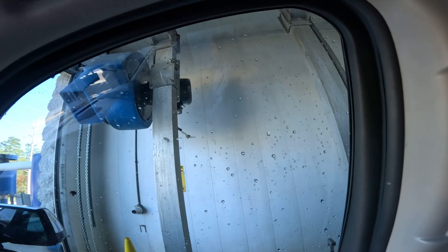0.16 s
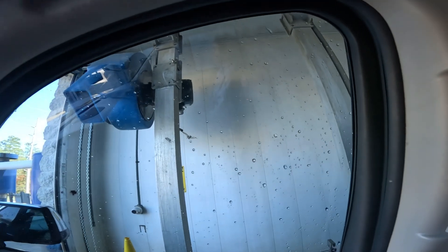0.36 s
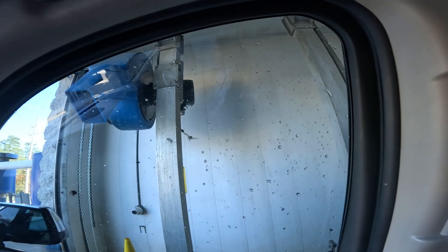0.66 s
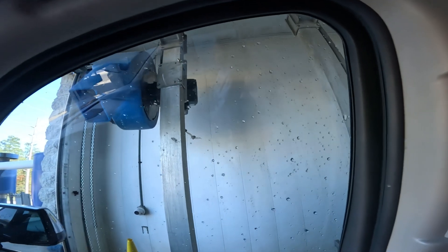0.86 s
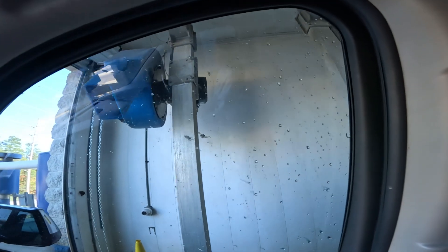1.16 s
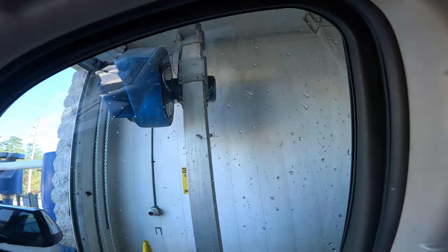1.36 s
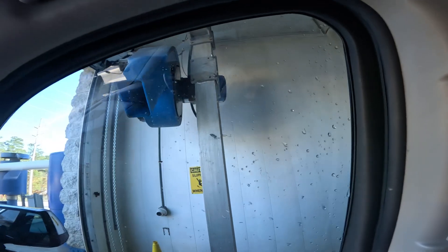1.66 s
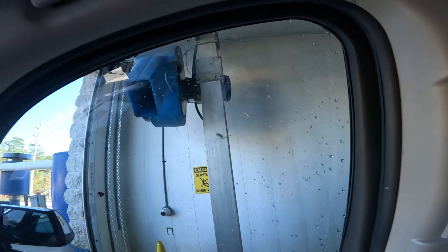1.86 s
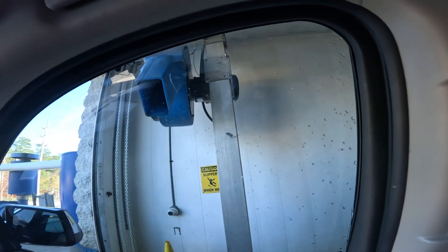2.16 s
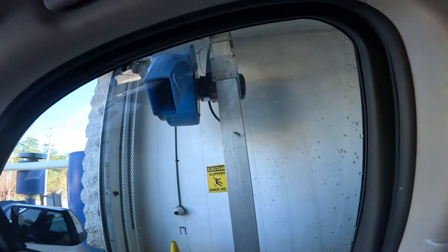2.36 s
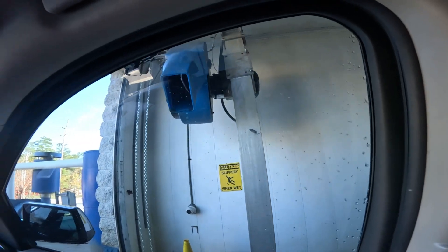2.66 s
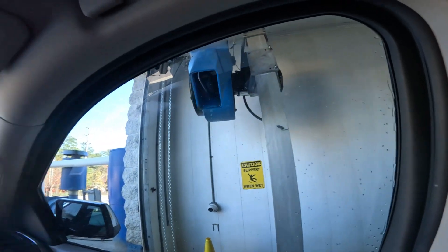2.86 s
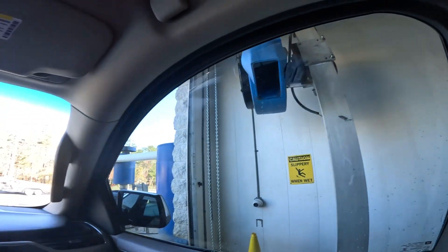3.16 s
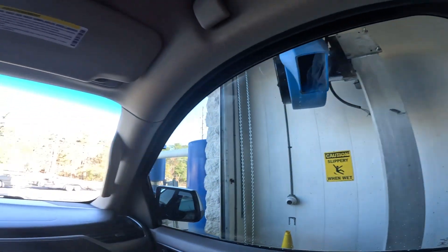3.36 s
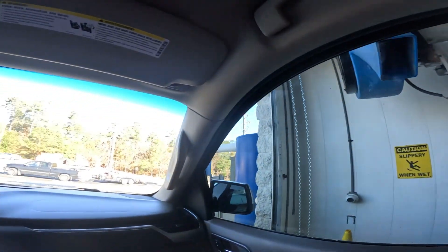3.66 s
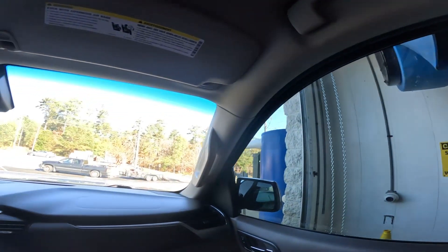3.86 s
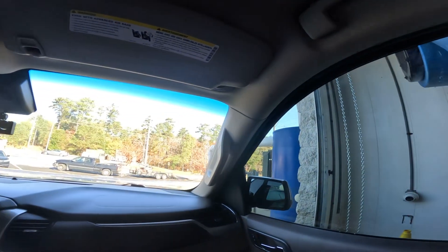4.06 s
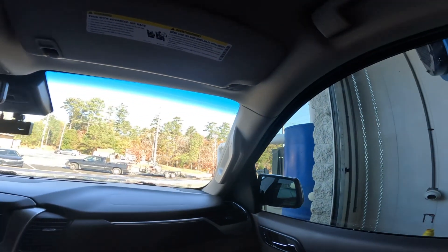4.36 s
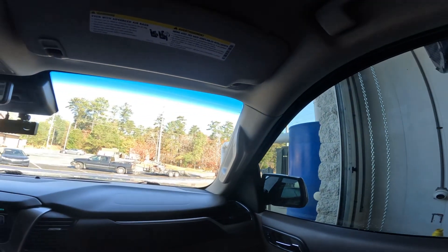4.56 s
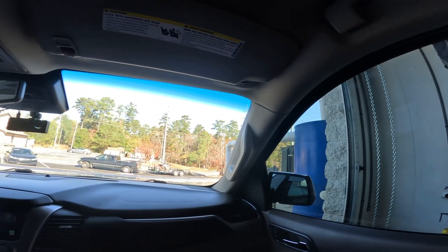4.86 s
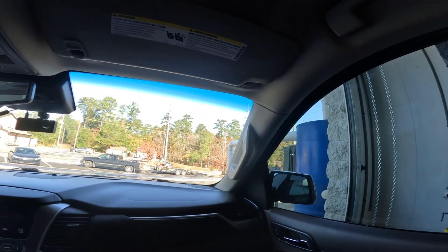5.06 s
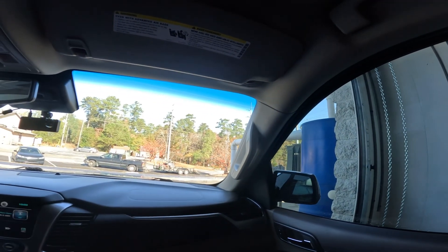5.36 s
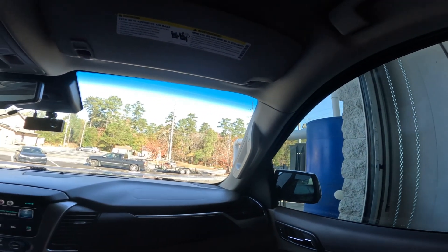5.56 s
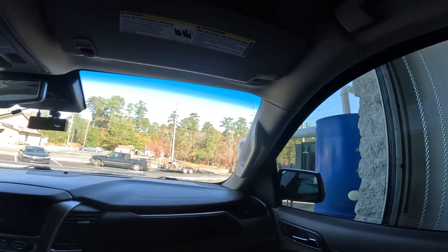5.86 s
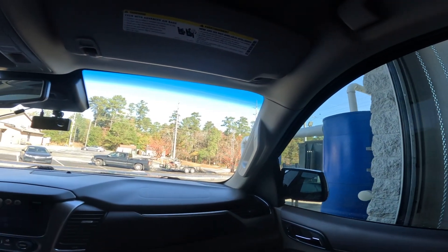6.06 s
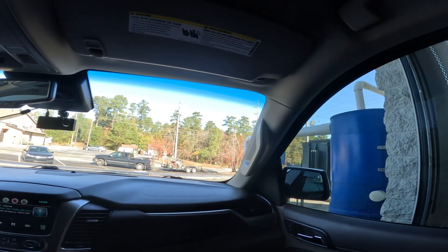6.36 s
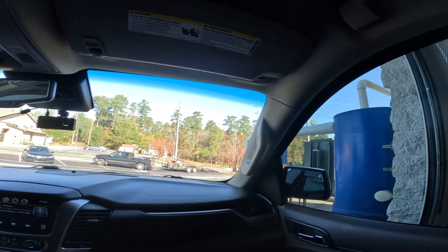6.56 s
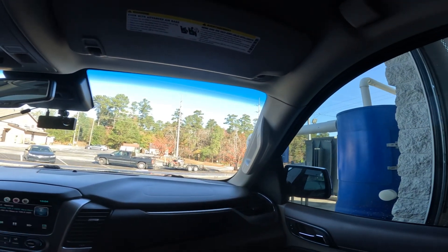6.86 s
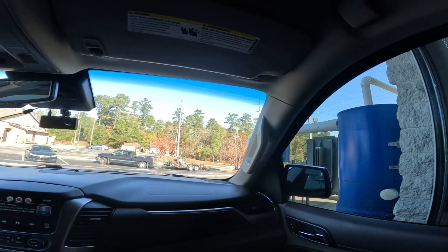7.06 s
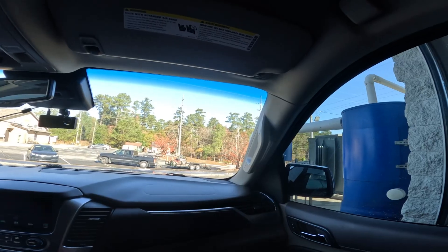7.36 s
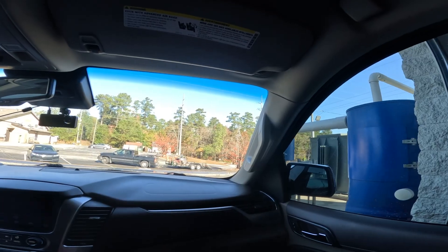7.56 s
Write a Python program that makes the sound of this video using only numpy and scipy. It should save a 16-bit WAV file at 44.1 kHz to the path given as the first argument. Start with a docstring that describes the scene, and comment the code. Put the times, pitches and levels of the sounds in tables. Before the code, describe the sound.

Inside a closed car, powerful car wash dryers make the cabin boom with deep, fluttering bass and a low unsteady drone under a muffled fan roar. A sharp drop ticks the window early. A faint whine grows, sags and vanishes about midway as the side jet roars on the glass; afterwards the rumble continues, deeper and less tonal. Close cabin microphone, wide stereo, slightly stronger on the left.

```python
"""Deep booms and a roar fill a closed car as it rolls slowly out beneath car wash drying blowers.
The air jets travel along the body: filtered noise sounds the resonances of cabin, panels and window in turn,
and unsteady sine tones make the body drone. Shaped noise carries the fan roar through the glass;
narrow noise bands give the blade tones, a wandering sine the faint whine, and short noise bursts the drops.
A limiter holds the bass down."""
import sys
import numpy as np
from scipy import signal
from scipy.fft import rfft, irfft, next_fast_len
from scipy.io import wavfile
from scipy.ndimage import uniform_filter1d, minimum_filter1d

SR = 44100
rng = np.random.default_rng(int(sys.argv[2]) if len(sys.argv) > 2 else 0)


def digitize_waveform(pressure):
    """Quantize a signal to 16-bit integers and store it at the path in sys.argv[1].

    Rows of a 2-D input are taken as channels; values are limited to [-1, 1].
    """
    field = np.atleast_2d(pressure).T
    bounded = np.clip(field, -1, 1)
    quanta = np.round(bounded * 32767).astype(np.int16)
    wavfile.write(sys.argv[1], SR, quanta)


N = 340893
T = np.arange(N) / SR
SIZE = next_fast_len(N, real=True)
HZ = np.fft.rfftfreq(SIZE, 1 / SR)

# All levels are those ahead of the bass limiter. A reach, rise or fall is the time to 1/e of a bell;
# the whine's rise and fall are the spans of soft steps.
# Booms of the cabin air, each loudest as the jet passes its antinode:
# centre_hz, width_hz, level_db (jet at the antinode), passing_s, reach_s, away_db (loss when the jet is far)
CABIN_MODES = [(31.82, 31, -21, 7.0, 3.2, 6.5), (62.82, 36, -19, 1.8, 2.9, 7),
               (101.9, 32, -21.5, 4.5, 3.6, 7.5), (129, 38, -20, 5.0, 1.0, 6.5),
               (206.1, 32, -26.5, 0.4, 2.1, 7), (333.3, 50, -30.5, 3.2, 1.5, 7),
               (380.6, 45, -36.5, 4.2, 1.5, 14.5), (515, 70, -45, 7.1, 1.1, 15.5)]
# Brief swells and dips of the deepest rumble: centre_s, change_db
RUMBLE_SURGES = [(2.55, 0.5), (4.05, -8.5), (4.4, 6)]
SURGE_REACH_S = 0.15
DEEP_BELOW_HZ = 90


def cabin():
    """Modal excitation: a jet drives each mode of the cabin air hardest at its antinode."""
    surge_db = np.zeros(N)
    for centre_s, change_db in RUMBLE_SURGES:
        surge_db += change_db * nearness(centre_s, SURGE_REACH_S, SURGE_REACH_S)
    out = np.zeros((2, N))
    for hz, width_hz, level_db, passing_s, reach_s, away_db in CABIN_MODES:
        away = 1 - nearness(passing_s, reach_s, reach_s)
        mode_db = level_db - away_db * away
        if hz < DEEP_BELOW_HZ:
            mode_db = mode_db + surge_db
        out += resonance(hz, width_hz) * gain_of(mode_db)
    return out


# Resonances of the roof and door panels: centre_hz, width_hz, level_db (at its loudest)
PANEL_MODES = [(144.8, 35, -25), (161.6, 19, -24), (236.8, 46, -28), (288.5, 62, -31), (424.5, 75, -37),
               (514.5, 90, -43), (653.4, 52, -51), (705, 58, -49.3), (751, 36, -55)]
# The jet drives the lowest panel resonance first and ever higher ones as the car rolls on.
SWEEP_START_S, SWEEP_S_PER_OCTAVE = 2.67, 1.24
PANEL_REACH_S, PANEL_AWAY_DB = 2.67, 6


def panels():
    """Forced plate vibration: the travelling jet drives the panel resonances in turn, from low to high."""
    lowest_hz = PANEL_MODES[0][0]
    out = np.zeros((2, N))
    for hz, width_hz, level_db in PANEL_MODES:
        passing_s = SWEEP_START_S + SWEEP_S_PER_OCTAVE * np.log2(hz / lowest_hz)
        away = 1 - nearness(passing_s, PANEL_REACH_S, PANEL_REACH_S)
        out += resonance(hz, width_hz) * gain_of(level_db - PANEL_AWAY_DB * away)
    return out


# Notes of the cabin air and the roof under the jet:
# pitch_hz (mean), wander_hz (rms), level_db (rms, before the flutter), start_s, end_s
DRONE_NOTES = [(62.3, 4, -24.5, 0.2, 3.75), (151.5, 3.2, -21.5, 1.5, 3.7)]
DRONE_FADE_S, DRONE_FLUTTER_DB = 0.13, 1.0


def drone():
    """Sustained oscillation: cabin air and roof each hum an unsteady note while the jet blows straight on."""
    out = np.zeros((2, N))
    for pitch_hz, wander_hz, level_db, start_s, end_s in DRONE_NOTES:
        pitch = pitch_hz + wander_hz * waver(slowest_hz=1.5, fastest_hz=14)
        under_jet = beyond(start_s, DRONE_FADE_S) * (1 - beyond(end_s, DRONE_FADE_S))
        out += tone(pitch, DRONE_FLUTTER_DB) * gain_of(level_db) * under_jet
    return out


# Resonances of the side window: centre_hz, width_hz, level_db (at its loudest)
WINDOW_MODES = [(571, 170, -44), (703, 110, -51.5), (966, 120, -54), (1268, 350, -50)]
# The side jet meets the window quickly and leaves it slowly.
SIDE_JET_S, SIDE_RISE_S, SIDE_FALL_S, SIDE_AWAY_DB = 3.71, 0.75, 1.8, 15


def window():
    """Turbulent excitation of a pane: the side jet crosses the window and makes the glass roar."""
    away = 1 - nearness(SIDE_JET_S, SIDE_RISE_S, SIDE_FALL_S)
    out = np.zeros((2, N))
    for hz, width_hz, level_db in WINDOW_MODES:
        out += resonance(hz, width_hz) * gain_of(level_db - SIDE_AWAY_DB * away)
    return out


# Spectrum of the fan roar in the hall, dulled by the closed windows: frequency_hz, density_db (dB per Hz)
ROAR_COLOUR = [(20.0, -17.5), (200.0, -1), (600, -1), (850, -1), (1020, -2.5), (1180, -4.5), (1600.0, -6),
               (2000.0, -10.5), (2400.0, -10.5), (3200.0, -15.5), (4100.0, -24), (5000.0, -26),
               (7700.0, -36.5), (8500.0, -41.5), (10300.0, -44.5), (13500.0, -62.5)]
# The roar drops once the nearest blower is past, and lifts again with the side jet; the waver is an rms.
# The drop's time is the span of a soft step.
ROAR_DB, ROAR_DROP_DB, ROAR_DROP_S, ROAR_LIFT_DB, ROAR_WAVER_DB = -42.5, 2, 0.25, 1, 0.45
BLOWER_S = 2.2  # the nearest blower passes the window


def hall():
    """Transmission loss: glass dulls the broad roar of fans and nozzles, which wavers a little."""
    colour_db, = read(ROAR_COLOUR, HZ)
    drop_db = ROAR_DROP_DB * beyond(BLOWER_S, ROAR_DROP_S)
    lift_db = ROAR_LIFT_DB * nearness(SIDE_JET_S, SIDE_RISE_S, SIDE_FALL_S)
    waver_db = ROAR_WAVER_DB * waver(slowest_hz=0.796, fastest_hz=6)
    return air(gain_of(colour_db)) * gain_of(ROAR_DB - drop_db + lift_db + waver_db)


HOUSING_HZ, HOUSING_WIDTH_HZ, HOUSING_DB = 975, 170, -47.5  # level as it passes
HOUSING_REACH_S, HOUSING_AWAY_DB = 0.8, 3.5


def housing():
    """Cavity resonance: the nearest blower's housing rushes hollowly, strongest as it passes the window."""
    away = 1 - nearness(BLOWER_S, HOUSING_REACH_S, HOUSING_REACH_S)
    return resonance(HOUSING_HZ, HOUSING_WIDTH_HZ) * gain_of(HOUSING_DB - HOUSING_AWAY_DB * away)


# Fans that the car rolls past: blade_hz, blur_hz, level_db (when closest), closest_s, reach_s
FAN_TONES = [(816, 36, -54.5, 0.76, 2), (700, 50, -52, 9.8, 2.0), (1390, 13, -62.5, 5.0, 2.9)]
FAN_AWAY_DB = 10


def fans():
    """Blade-passing tones: turbulence blurs each into a narrow band, loudest when its fan is closest."""
    out = np.zeros((2, N))
    for blade_hz, blur_hz, level_db, closest_s, reach_s in FAN_TONES:
        away = 1 - nearness(closest_s, reach_s, reach_s)
        out += resonance(blade_hz, blur_hz) * gain_of(level_db - FAN_AWAY_DB * away)
    return out


# Pitch before the sag, rms wander, rms level before the flutter
WHINE_HZ, WHINE_WANDER_HZ, WHINE_DB = 941, 6.9, -54
# Midpoints and spans of the soft steps
WHINE_START_S, WHINE_RISE_S, WHINE_END_S, WHINE_FALL_S = 1.0, 1.1, 3.45, 0.1
WHINE_SAG_HZ, WHINE_SAG_S, WHINE_SAG_SPAN_S = 40, 3.1, 0.22


def whine():
    """Frequency modulation: the nearest blower's whine grows, then sinks and is gone as the car leaves it."""
    sag_hz = WHINE_SAG_HZ * beyond(WHINE_SAG_S, WHINE_SAG_SPAN_S)
    wander_hz = WHINE_WANDER_HZ * waver(slowest_hz=3.6, fastest_hz=30.5)
    pitch = WHINE_HZ - sag_hz + wander_hz
    heard = beyond(WHINE_START_S, WHINE_RISE_S) * (1 - beyond(WHINE_END_S, WHINE_FALL_S))
    return tone(pitch, flutter_db=3.5) * gain_of(WHINE_DB) * heard


# Drops flung on the glass: start_s, peak_db, decay_s, treble_lift_db (dB per octave)
GLASS_DROPS = [(0.4878, -39.5, 0.0032, -4), (1.4322, -54, 0.005, 6)]
# Dry colour of a tick on the glass, before the treble lift: frequency_hz, density_db (dB per Hz)
TICK_COLOUR = [(1200, -9), (2800, 0), (4300, 1), (6200, -12), (9500, -17), (12600, -19), (14000, -36)]
TICK_PIVOT_HZ = 4000  # the treble lift is nil here


def drops():
    """Impact sound: each drop is a dry tick of coloured noise that decays exponentially."""
    tick_db, = read(TICK_COLOUR, HZ)
    octaves = np.log2(np.maximum(HZ, TICK_COLOUR[0][0]) / TICK_PIVOT_HZ)
    ticks = np.zeros(N)
    for start_s, peak_db, decay_s, lift_db in GLASS_DROPS:
        spectrum = rfft(rng.standard_normal(SIZE)) * gain_of(tick_db + lift_db * octaves)
        fizz = irfft(spectrum, SIZE)[:N]
        decay = np.exp(-np.clip((T - start_s) / decay_s, 0, 20))
        tick = fizz * (T >= start_s) * decay
        ticks += gain_of(peak_db) * tick / abs(tick).max()
    return ticks


# Colour of the spray: frequency_hz, density_db (dB per Hz)
SPRAY_COLOUR = [(1500, -22), (3000, 1), (4600, 0), (6000, -15), (10000, -30), (14000, -46)]
SPURT_S, SPURT_RISE_S, SPURT_FALL_S, SPURT_DB = 3.972, 0.015, 0.05, -62


def spray():
    """Noise burst: one spurt of spray hisses across the window."""
    colour_db, = read(SPRAY_COLOUR, HZ)
    spurt = gain_of(SPURT_DB) * nearness(SPURT_S, SPURT_RISE_S, SPURT_FALL_S)
    return air(gain_of(colour_db)) * spurt


def droplets(per_s, level_db, centre_hz, ring_s):
    """Random impacts: fine water off the roof pricks the glass; level_db is the peak of the smallest."""
    extra_db = 3.5 * np.minimum(rng.exponential(1, N), 3)
    sizes = gain_of(extra_db) * (rng.random(N) < per_s / SR)
    t = np.arange(SR // 20) / SR
    edges_hz = [centre_hz * 0.59, min(centre_hz * 1.2, SR / 2 - 1)]
    band = signal.butter(2, edges_hz, "bandpass", fs=SR, output="sos")
    prick = signal.sosfilt(band, rng.standard_normal(len(t)) * np.exp(-t / ring_s))
    return gain_of(level_db) * signal.oaconvolve(sizes, prick / abs(prick).max())[:N]


# The two microphone ports: frequency_hz, likeness (0-1), right_lead_rad, left_minus_right_db
PORT_FIELD = [(45, 0.999, 0.08, 1.9), (110, 0.999, 0.04, 1.7), (180, 0.996, 0.28, 1.0),
              (300, 0.981, 0.4, 1.4), (450, 0.933, 0.51, 1.9), (620, 0.826, 0.73, 2.1),
              (850, 0.878, 0.75, 2.2), (1050, 0.853, 0.59, 2.3), (1900, 0.765, 0.71, 2.8),
              (3100, 0.639, 0.96, 2.8), (4800, 0.458, 0.12, 2.3), (10000, 0.741, 0.0, 1.1)]


def air(shape):
    """Spatial coherence: shaped noise, alike at both ports in the bass, diffuse above; its mean has rms one."""
    same, lead, tilt_db = read(PORT_FIELD, HZ[:len(shape)])
    same = np.clip(same, 0, 1)
    a, b, c, d = rng.standard_normal((4, len(shape)))
    left = a + 1j * b
    independent = c + 1j * d
    right = (same * left + np.sqrt(1 - same ** 2) * independent) * np.exp(1j * lead)
    lean = gain_of(tilt_db / 2)
    pair = irfft(np.array([left * lean, right / lean]) * shape, SIZE)[:, :N]
    return pair / np.std(pair.mean(0))


def tone(hz, flutter_db):
    """Phase is integrated frequency: a tone of rms about one follows the pitch curve and flutters in level."""
    _, lead, tilt_db = read(PORT_FIELD, hz.mean())
    phase = 2 * np.pi * np.cumsum(hz) / SR
    lean = gain_of(tilt_db / 2)
    pair = np.array([lean * np.sin(phase), np.sin(phase + lead) / lean])
    return np.sqrt(2) * pair * gain_of(flutter_db * waver(slowest_hz=2, fastest_hz=20))


def resonance(hz, width_hz):
    """Resonant response: turbulence rings in one steep-sided peak, at half amplitude across its width."""
    f = HZ[HZ < hz + 20 * width_hz] + 1e-6
    detuning = (f ** 2 - hz ** 2) / (f * width_hz)
    return air(1 / (1 + detuning ** 2))


def nearness(passing_s, rise_s, fall_s):
    """Proximity law: a bell, 0 far away and 1 at the moment of passing, with its own rise and fall."""
    span_s = np.where(T < passing_s, rise_s, fall_s)
    return np.exp(-((T - passing_s) / span_s) ** 2)


def beyond(passing_s, span_s):
    """Gradual transition: a soft step from 0 before a point is passed to 1 after it."""
    return .5 + .5 * np.tanh((T - passing_s) / span_s)


def waver(slowest_hz, fastest_hz):
    """Superposition: slow sines of random phase, weaker as they quicken, add to a wander of rms one."""
    rates = np.geomspace(slowest_hz, fastest_hz, 20)
    wander = sum(np.sin(2 * np.pi * (hz * T + rng.random())) / np.sqrt(hz) for hz in rates)
    return wander / np.std(wander)


def gain_of(db):
    """Logarithmic level: decibels to amplitude."""
    return 10 ** (np.asarray(db) / 20)


def read(points, hz):
    """Logarithmic frequency scale: straight lines join each column of a spectrum table."""
    f, *columns = np.transpose(points)
    return [np.interp(np.log(hz + 1), np.log(f + 1), column) for column in columns]


def scene():
    """Superposition: everything that reaches the passenger seat adds up."""
    body = cabin() + panels() + drone() + window()
    blowers = hall() + housing() + fans() + whine()
    fine_water = droplets(per_s=9, level_db=-73, centre_hz=8800, ring_s=.012)
    return body + blowers + drops() + spray() + fine_water


def limiter(x, drive_db, ceiling_db, recovery_db_per_s):
    """Look-ahead gain control: it turns peaks down a few milliseconds early and recovers steadily."""
    driven = x * gain_of(drive_db)
    over_db = np.maximum(20 * np.log10(abs(driven).max(0) + 1e-9) - ceiling_db, 0)
    ahead_db = -minimum_filter1d(-over_db, size=520)  # the largest excess nearby, in samples
    fall = T * recovery_db_per_s
    held_db = np.maximum.accumulate(ahead_db + fall) - fall
    return driven * gain_of(-uniform_filter1d(held_db, size=520))


EDGE_HZ = 14000


def record(dry):
    """Split-band limiting: the bass is held on its own, so the hiss stays even; then comes the band limit."""
    bass = signal.sosfiltfilt(signal.butter(2, 300, fs=SR, output="sos"), dry)
    held_bass = limiter(bass, drive_db=1.0, ceiling_db=-8.5, recovery_db_per_s=72.0)
    full = held_bass + dry - bass
    band_limit = signal.firwin(511, EDGE_HZ, window=("kaiser", 9), fs=SR)
    return signal.oaconvolve(full, band_limit[None], "same")


dry = scene()
out = record(dry)
digitize_waveform(out)
```